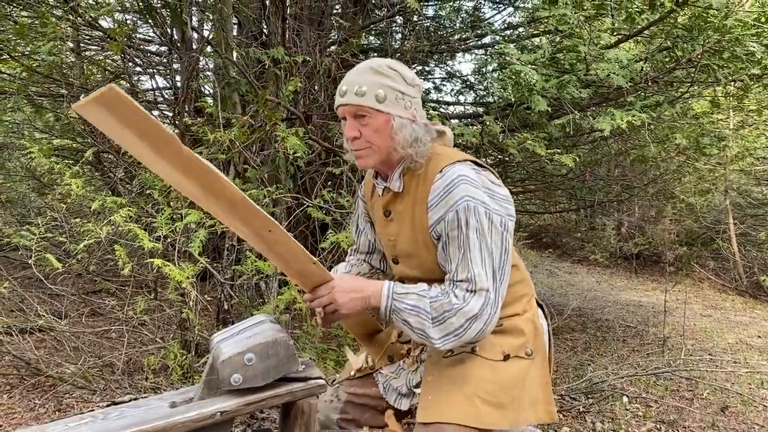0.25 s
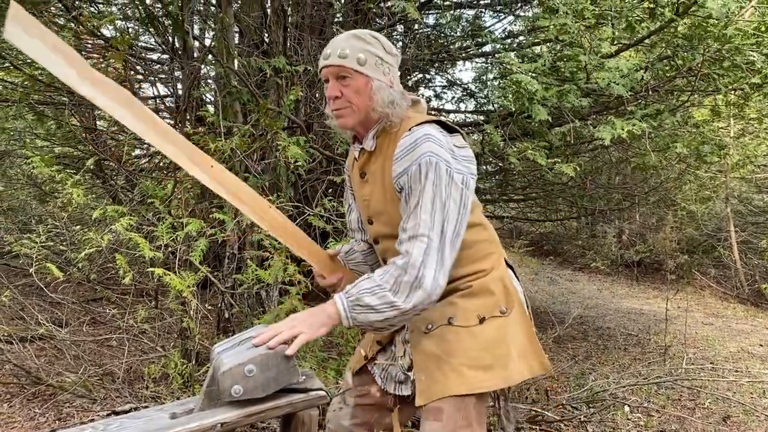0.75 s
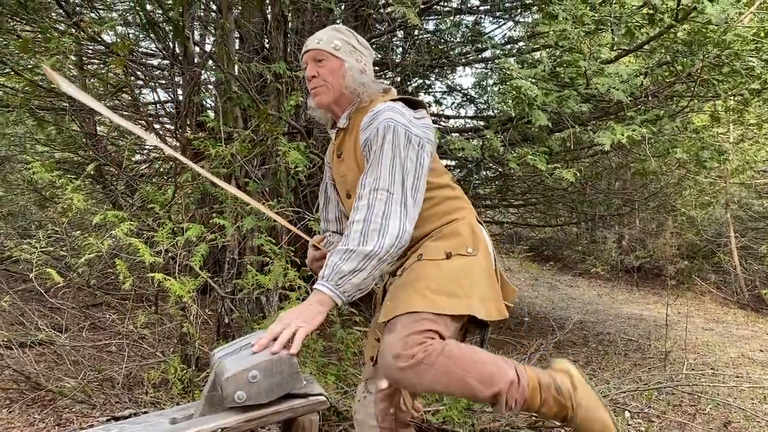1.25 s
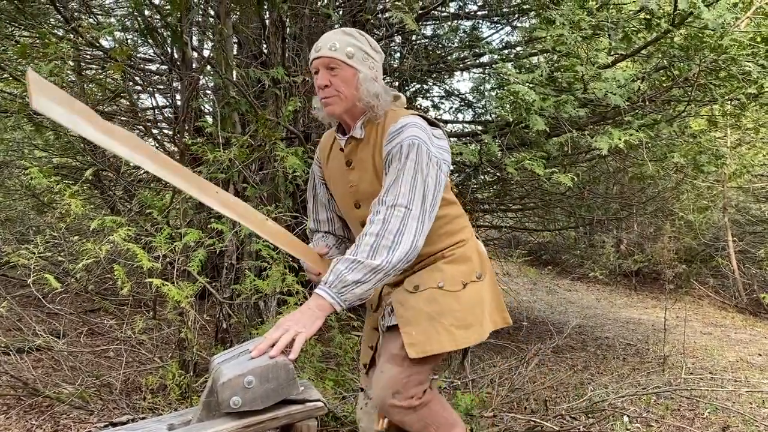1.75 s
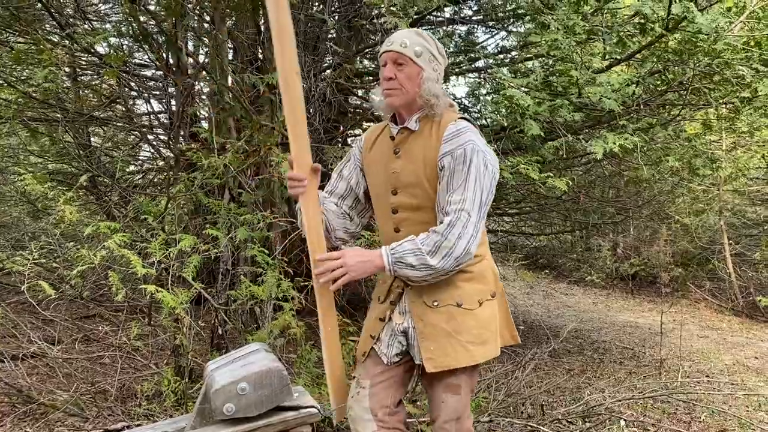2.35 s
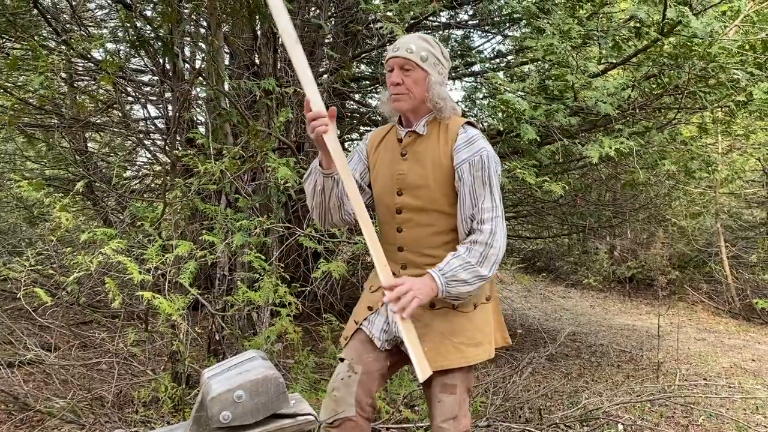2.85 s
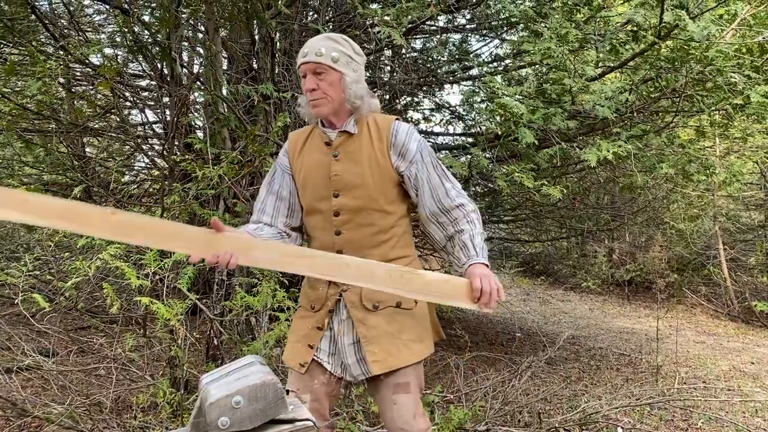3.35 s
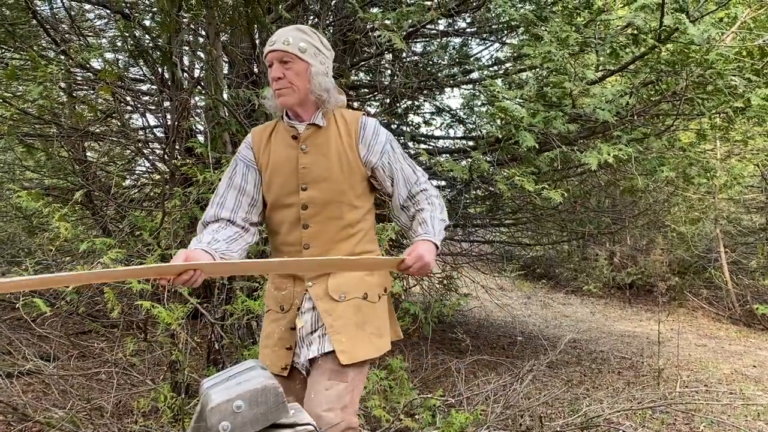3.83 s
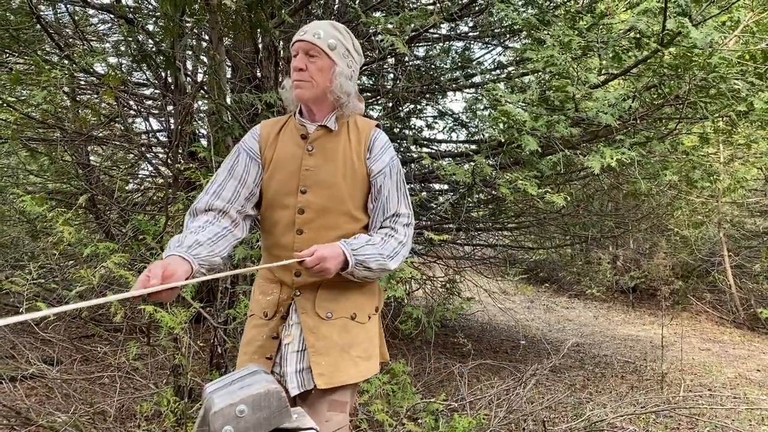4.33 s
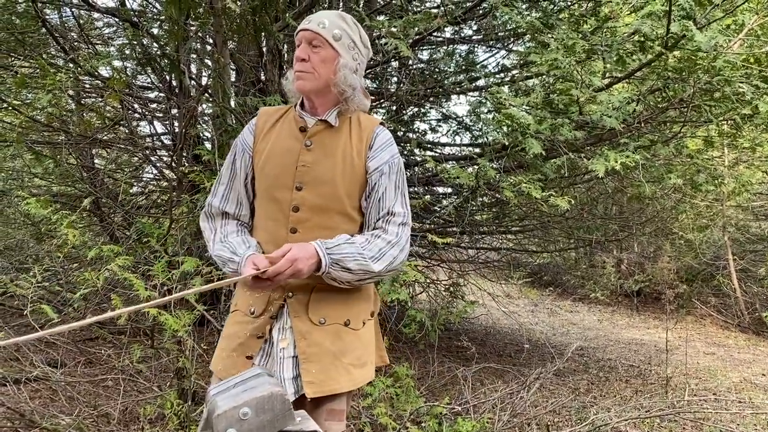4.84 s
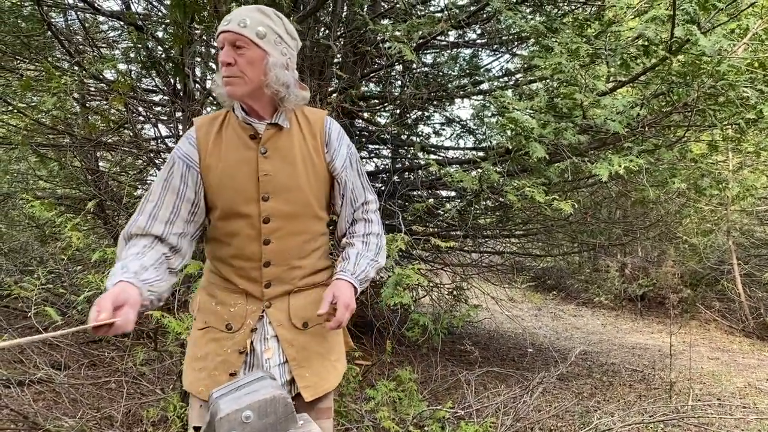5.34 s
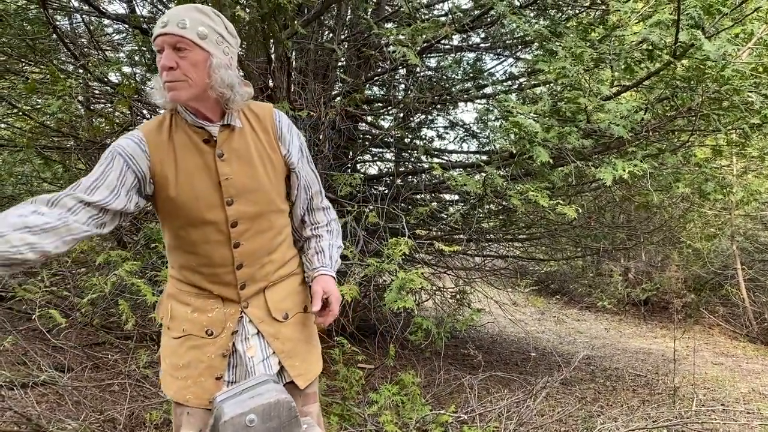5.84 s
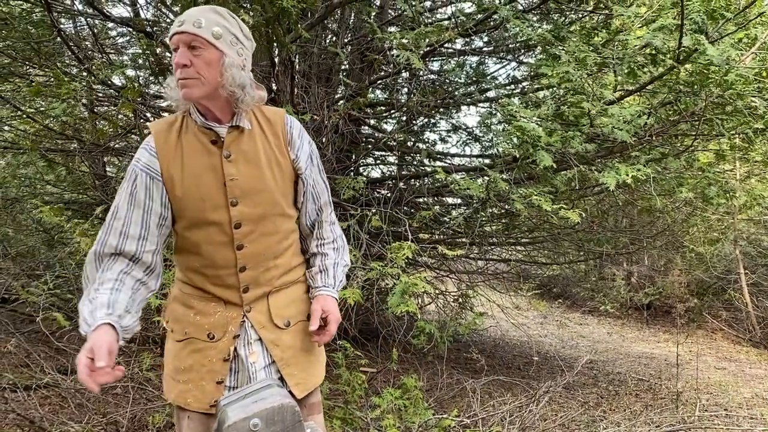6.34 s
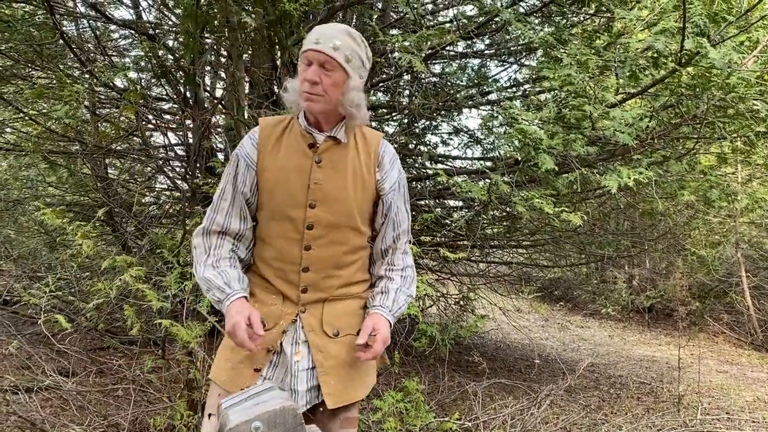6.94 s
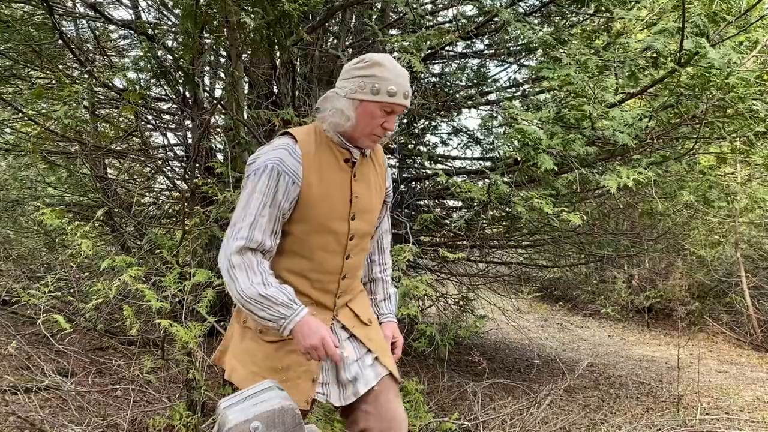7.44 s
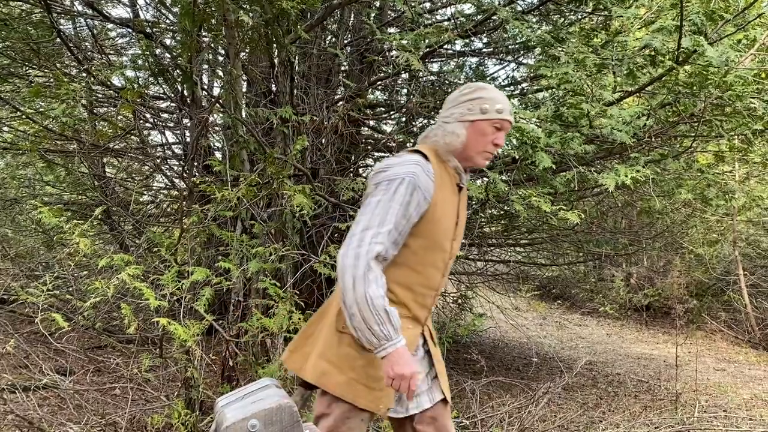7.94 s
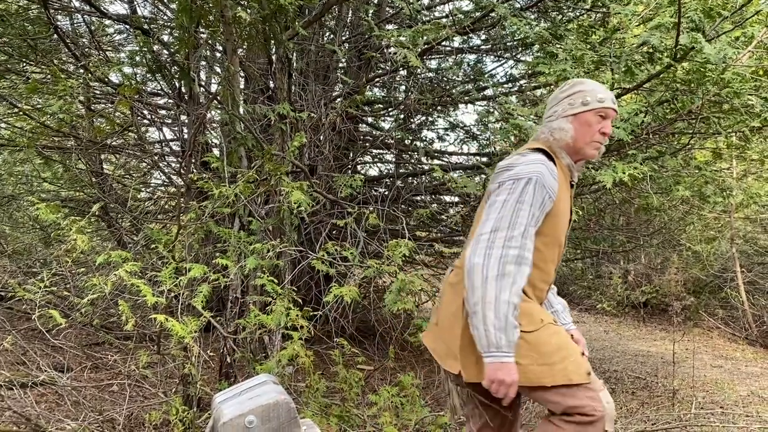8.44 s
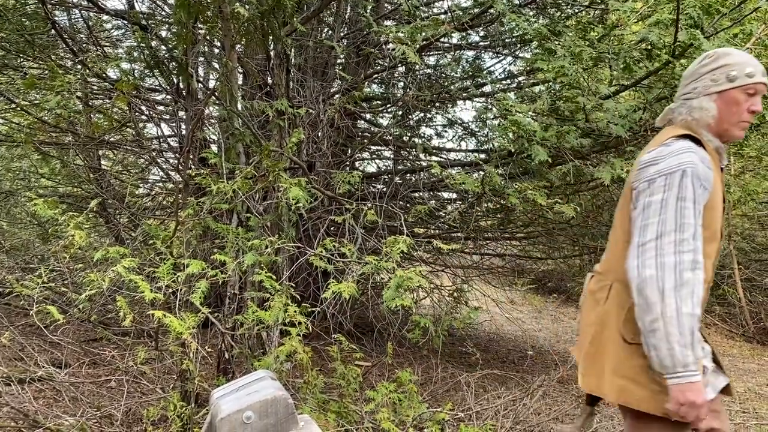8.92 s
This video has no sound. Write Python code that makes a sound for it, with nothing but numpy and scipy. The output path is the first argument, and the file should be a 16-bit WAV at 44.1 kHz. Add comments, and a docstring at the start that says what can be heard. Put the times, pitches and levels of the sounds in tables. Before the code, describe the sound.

Close outdoor sound in a quiet wood with faint distant engine hum. A man climbs off a wooden work bench, feet rustling and crunching in shavings and dry litter with small twig cracks. A palm smacks the end of a thin board; it rubs lightly, then drops onto a pile with a loud hollow clatter, bouncing and rattling to rest. Crackling steps then move off.

```python
"""A long thin board slides onto a pile, drops, bounces and rattles: noise bursts and rubs drive damped modes.
A man climbs off a shaving horse, treads on shavings and dry litter, and walks away: grains, cracks, thuds.
A palm smacks the board's end and dull bumps fall: damped sines. Behind lie a quiet wood, as filtered
noise, and far engines, as wavering tones. The recorder turns itself down after loud blows."""
import sys
import numpy as np
from scipy import signal
from scipy.fft import rfft, irfft
from scipy.io import wavfile
from scipy.ndimage import uniform_filter1d

SR = 44100
rng = np.random.default_rng(int(sys.argv[2]) if len(sys.argv) > 2 else 0)


def unload_audio(sound):
    """Save the sound as a 16-bit wav file, at the path given as the first command line argument."""
    columns = np.transpose(np.atleast_2d(sound))
    # keep every value between -1 and 1, then stretch to whole-number steps
    steps = np.round(np.clip(columns, -1, 1) * 32767)
    wavfile.write(sys.argv[1], SR, steps.astype(np.int16))


N = 404838


def from_db(db):
    """Decibels to amplitude gain."""
    return 10 ** (np.asarray(db) / 20)


def rms_one(x):
    """Scale to rms 1."""
    return x / np.sqrt(np.mean(x ** 2) + 1e-20)


def in_time(rows):
    """Interpolate the columns of a curve table to one value a sample."""
    s, *columns = np.transpose(rows)
    return [np.interp(np.arange(N) / SR, s, column) for column in columns]


def filtered(x, order, hz, kind):
    """Butterworth filter."""
    return signal.sosfilt(signal.butter(order, hz, kind, fs=SR, output="sos"), x)


def colour(x, spectrum):
    """Minimum-phase filter that follows the spectrum; white noise of rms 1 comes out with rms 1."""
    hz, db = np.transpose(spectrum)
    grid_hz = np.linspace(0, SR / 2, 4097)
    log_gain = np.log(from_db(np.interp(np.log(grid_hz + 1), np.log(hz), db)))
    cepstrum = irfft(log_gain)
    cepstrum[1:4096] *= 2
    cepstrum[4097:] = 0       # folding the cepstrum gives the minimum phase
    kernel = irfft(np.exp(rfft(cepstrum)))[:4096]
    return signal.fftconvolve(x, kernel / np.sqrt(np.sum(kernel ** 2)))[:N]


def drift(rate_hz):
    """Slow random wandering of rms 1: noise through a two-pole lowpass."""
    r = np.exp(-2 * np.pi * rate_hz / SR)
    noise = rng.standard_normal(N + SR)
    return rms_one(signal.lfilter([1], [1, -2 * r, r * r], noise)[SR:])


def ring(force, hz, t60_s):
    """Damped resonator: a unit click sets a sine of starting height 1 ringing."""
    r, w = from_db(-60 / (t60_s * SR)), 2 * np.pi * hz / SR
    return signal.lfilter([0, np.sin(w)], [1, -2 * r * np.cos(w), r * r], force + 1e-18)


def grains(per_s, spread_db, clump_db, hiss):
    """Random clicks of uneven size plus a share of friction hiss, swelling in clumps; rms 1."""
    sizes = from_db(spread_db * np.minimum(rng.exponential(1, N), 5)) * rng.choice([-1, 1], N)
    born = rng.random(N) < per_s / SR
    clumps = from_db(clump_db * drift(25.0))
    return rms_one(clumps * (rms_one(sizes * born) + hiss * rng.standard_normal(N)))


def bursts(rows, t60s, texture, contact=0.92):
    """Bursts of a texture at (s, dB), each led by the click of first contact and dying with its own t60."""
    envelope, clicks = np.zeros(N + SR), np.zeros(N)
    t = np.arange(SR // 4) / SR
    for (s, db), t60_s in zip(rows, t60s):
        envelope[round(s * SR):][:len(t)] += from_db(db - 60 * t / max(t60_s, .002))
        clicks[round(s * SR)] = contact * from_db(db)
    return envelope[:N] * texture + clicks


def thuds(rows):
    """Damped sines at (s, dB, Hz, cycles until 60 dB down)."""
    out, click = np.zeros(N + 8000), np.arange(8000) == 0
    for s, db, hz, cycles in rows:
        out[round(s * SR):][:8000] += ring(from_db(db) * click, hz, cycles / hz)
    return out[:N]


def ticks(clicks, cycles):
    """Each click is dealt to one of 12 small dry splinters, ringing a few cycles at its own pitch."""
    dealt = rng.integers(0, 12, N)
    pitches_hz = np.geomspace(2200, 9000, num=12)
    return sum(ring(clicks * (dealt == k), hz, cycles / hz) for k, hz in enumerate(pitches_hz))


# Air spectrum. Each row: pitch in Hz, relative level in dB.
AIR_SPECTRUM = [(15, -51), (25, -6), (180, 6.5), (242, -4.5), (962, -4), (1400, -11.5), (1890, -32),
                (4370, -24), (14800, -21.5), (16000, -22)]
AIR_DB = -63.5


def air():
    """Air of the wood: coloured noise of gently wandering level."""
    level = from_db(AIR_DB + 0.45 * drift(2.0))
    return level * colour(rng.standard_normal(N), AIR_SPECTRUM)


# Far hums. Each row: start in seconds, end in seconds, pitch in Hz, rms wavering in Hz, mean level in dB.
FAR_HUMS = [(.4, 1.83, 183, 3.84, -67), (2.603, 5.048, 64, 3.55, -70.5), (5.2, 8.404, 103, 2.5, -65)]


def hums():
    """Far engines: sines of wandering pitch that swell and fade."""
    t, out = np.arange(N) / SR, np.zeros(N)
    for start, end, hz, waver_hz, db in FAR_HUMS:
        fade = np.clip(np.minimum(t - start, end - t) / 0.25, 0, 1)
        swell = fade * from_db(db + 2.0 * drift(1.5))
        out += swell * np.sin(2 * np.pi * np.cumsum(hz + waver_hz * drift(3.85)) / SR)
    return out


# Steps and shifts of weight in the litter. Each row: loudest moment in seconds, dying time in seconds,
# crisp rustle level in dB, dull crunch level in dB.
FOOTFALLS = [(.09, 0.081, -57.5, -65), (.32, 0.13, -50, -54.5), (.55, .06, -62, -66),
             (.71, 0.13, -64.5, -59), (.92, 0.094, -55.5, -58), (1.12, 0.093, -60.5, -57.5),
             (1.4, 0.18, -61.5, -73), (1.84, 0.52, -48.5, -49.5), (2.1, 0.34, -49.5, -48.5),
             (2.5, 0.11, -54.5, -54.5), (3.0, 0.12, -49.5, -50.5), (3.25, .12, -47, -52),
             (3.39, .2, -53, -55), (3.73, 0.19, -52, -50.5), (3.85, 0.22, -51, -49.5),
             (4.07, 0.095, -58, -52.5), (4.33, 0.23, -59.5, -50), (4.5, 0.34, -54.5, -58.5),
             (4.74, 0.11, -54, -54), (5.12, .1, -58.5, -54.5), (5.36, 0.19, -54, -50),
             (5.71, 0.047, -48, -45.5), (6.55, 0.31, -63, -61), (6.88, 0.14, -59.5, -57),
             (7.16, 0.13, -56, -51.5), (7.319, 0.23, -48, -49), (7.62, 0.074, -55, -54.5),
             (7.909, 0.084, -42.5, -42.5), (8.43, 0.055, -63, -66), (8.669, .28, -56.5, -54)]
# Cloth and shavings stirring between the steps. Each row: time in seconds, rustle level in dB.
STIR_CURVE = [(0, -67.5), (.22, -62), (.65, -69.5), (1.75, -67.5), (2.55, -61), (2.7, -52), (2.92, -51.5),
              (3.12, -63), (4.2, -70), (4.9, -63.5), (5.25, -65), (5.63, -59), (5.8, -67), (7.05, -72),
              (7.5, -61), (7.7, -59), (7.8, -48), (8.02, -57), (8.3, -68), (9.18, -69.5)]
PRESS_S, PRESS_DB, FADE_DB = 0.079, 12, 12      # rustle: rise per press time, fall per dying time
CRUNCH_SWING = 1.51      # crunch dB per rustle dB within a step
STIR_CRUNCH_DB, STIR_CRUNCH_SWING = -65, 1.06      # crunch at a stir of -60.5 dB; crunch dB per stir dB


def tread_levels():
    """Gains of rustle and crunch: each step presses and fades; steps and stir add in power."""
    t, (stir_db,) = np.arange(N) / SR, in_time(STIR_CURVE)
    crisp_power = from_db(stir_db) ** 2
    crunch_power = from_db(STIR_CRUNCH_DB + STIR_CRUNCH_SWING * (stir_db + 60.5)) ** 2
    for s, dying_s, crisp_db, crunch_db in FOOTFALLS:
        near = slice(max(round(s * SR) - SR // 2, 0), round(s * SR) + SR)
        press_db = PRESS_DB * (s - t[near]) / PRESS_S
        fade_db = FADE_DB * (t[near] - s) / dying_s
        below_db = np.maximum(press_db, fade_db)
        crisp_power[near] += from_db(crisp_db - below_db) ** 2
        crunch_power[near] += from_db(crunch_db - CRUNCH_SWING * below_db) ** 2
    return np.sqrt(crisp_power), np.sqrt(crunch_power)


# Spectra of the dull crunch and the crisp rustle. Each row: pitch in Hz, relative level in dB per Hz.
CRUNCH_SPECTRUM = [(53, -26), (90, -25.5), (209, -4), (264, 3), (422, 0.5), (561, 1), (2000, -15),
                   (2600, -123), (4400, -120)]
CRISP_SPECTRUM = [(880, -46.5), (1500, -1.5), (1920, -11), (2300, -3.5), (2830, -7), (3660, 0.5),
                  (4460, -1), (8570, -8), (16000, -31)]


def tread():
    """Litter gives under the foot with a dull crunch while its dry edges hiss and crackle."""
    crisp_gain, crunch_gain = tread_levels()
    crush = grains(2000, spread_db=2.8, clump_db=2.5, hiss=0.9)
    lumps = grains(250, spread_db=4.0, clump_db=4.5, hiss=0.62)      # larger pieces giving way
    crackle = rms_one(ticks(grains(260, spread_db=3.8, clump_db=3.0, hiss=0), cycles=11.5))
    sparse = grains(45, spread_db=3.0, clump_db=0, hiss=0)
    rustle = colour(crush + .33 * sparse, CRISP_SPECTRUM) * from_db(1.9 * drift(3.2))
    crisp = rustle + 0.43 * crackle
    crunch = colour(0.88 * crush + 1.064 * lumps, CRUNCH_SPECTRUM)
    return crunch_gain * crunch + crisp_gain * crisp


# Short sharp cracks: twigs, shavings, and the board's edge striking the pile.
# Each row: time in seconds, relative crack level in dB, relative thud level in dB.
SHARP_CRACKS = [(.2369, -34, -42), (0.3353, -26, -53), (.9254, -29.5, -29.5), (1.3648, -32, -42),
                (2.087, -31, -28), (2.1296, -25, -27), (2.4869, -28.5, -30), (2.9394, -25, -26),
                (2.955, -31.5, -26.5), (2.9971, -27, -32), (3.026, -28.5, -25), (3.1557, -28.5, -42),
                (3.1923, -19.5, -26.5), (3.233, -21, -28), (3.253, -25, -37), (3.2707, -27.5, -36),
                (3.712, -31.5, -35), (3.9738, -30.5, -22), (4.1433, -29.5, -41), (5.051, -36, -45),
                (5.342, -25, -35), (5.965, -6, -23), (6.5613, -32.5, -57), (6.6184, -35.5, -36.5),
                (6.6775, -44, -34), (6.803, -36, -47), (6.855, -30, -36), (7.066, -41.5, -50),
                (7.3303, -28, -33), (7.616, -51, -32), (7.9174, -22, -30), (7.9684, -23.5, -33),
                (8.4255, -44, -30), (9.16, -31.5, -40)]


def cracks():
    """A short bright noise burst with a high damped ring, over a brief thud."""
    rows = np.array(SHARP_CRACKS)
    crack = bursts(rows[:, :2], np.full(len(rows), .014), rng.standard_normal(N))
    crack = colour(crack, CRISP_SPECTRUM) * from_db(-8.5)
    chance = rng.standard_normal((len(rows), 2))
    ring_hz = 3600 * 2 ** (.5 * chance[:, 0])
    thud_hz = 520 * 2 ** (0.51 * chance[:, 1])
    high_ring = thuds([(s, db - 7.0, hz, 22.0) for (s, db, _), hz in zip(SHARP_CRACKS, ring_hz)])
    thud = thuds([(s, db, hz, 4.0) for (s, _, db), hz in zip(SHARP_CRACKS, thud_hz)])
    return crack + high_ring + filtered(thud, 2, 220, "high")


# Heels on soft ground, shins against wood. Each row: time in seconds, level in dB, pitch in Hz,
# cycles until 60 dB down.
BODY_BUMPS = [(1.089, -42, 446, 49), (1.1, -41, 115, 4.9), (2.13, -36, 126, 5.5), (5.3, -43, 143, 10),
              (6.932, -37.5, 445, 24)]


def bumps():
    """Soft blows of heels and shins: damped sines."""
    return thuds(BODY_BUMPS)


# Rings of the smacked board end, lowest first. Each row: level in dB, pitch in Hz, cycles until 60 dB down.
SMACK_MODES = [(-14.5, 537, 8.8), (-23, 1000, 10), (-17, 1700, 12.7), (-28.5, 2340, 10), (-16, 3540, 17)]
SMACK_S, SMACK_LAG_S = 4.6122, .0005      # first ring; lag of each next higher ring


def smack():
    """A palm smacks the end of the board: damped sines, each higher one slightly later."""
    return thuds([(SMACK_S + k * SMACK_LAG_S, *mode) for k, mode in enumerate(SMACK_MODES)])


# Slap spectrum. Each row: pitch in Hz, relative level in dB per Hz.
SLAP_SPECTRUM = [(710, -7), (1200, 0), (2110, 11.5), (3620, 11.5), (6510, -1), (9010, -15), (16000, -70)]
SLAP_T60_S, SOFT_SLAP_DB, SOFT_SLAP_HZ = 0.1, -30, 4180      # slaps weaker than this are lowpassed here


def board_slap(rows):
    """Surfaces clap together: bursts of contact grains, the weak ones muffled."""
    contacts = grains(900, spread_db=3.5, clump_db=0.5, hiss=0.98)
    is_hard = rows[:, 2] >= SOFT_SLAP_DB
    hard, soft = (bursts(some[:, [0, 2]], np.full(len(some), SLAP_T60_S), contacts)
                  for some in (rows[is_hard], rows[~is_hard]))
    return colour(hard + filtered(soft, 2, SOFT_SLAP_HZ, "low"), SLAP_SPECTRUM)


# The board knocking on the pile. Each row: time in seconds, relative blow level in dB,
# relative slap level in dB, dullness in dB per octave.
BOARD_KNOCKS = [(4.277, -27, -52.5, 4), (4.338, -35.5, -58, 11), (5.021, -41.5, -52, 3.5),
                (5.341, -29.5, -34, 4), (5.869, -8.5, -21.5, -1.5), (5.878, -14, -30, 1.5),
                (5.915, -5, -24, 4.5), (5.933, -6.5, -28.5, -2), (5.963, -16, -25, 1.5),
                (6.018, -21, -37, 4.5), (6.036, -13, -30.5, 2.5), (6.045, -21, -34.5, 3),
                (6.057, -18, -36, 9), (6.076, -11.5, -28.5, 1.5), (6.129, -20.5, -37, 1.5),
                (6.139, -24.5, -37.5, 4), (6.155, -18.5, -46, 6.5), (6.212, -25.5, -52, 4),
                (6.223, -24.5, -43.5, 4.5), (6.271, -26.5, -51, 2), (6.297, -26.5, -49.5, 4.5),
                (6.362, -32, -57, 8.5), (6.428, -42, -59, 11)]
# The board rubbing over the pile and shuddering to rest. Each row: middle in seconds, length in seconds,
# relative level in dB, centre pitch in Hz.
BOARD_RUBS = [(4.794, 0.14, -60.5, 860), (4.872, 0.072, -43.5, 806), (4.928, 0.032, -46, 820),
              (5.058, 0.028, -39, 996), (5.124, 0.13, -52.5, 1110), (5.302, 0.13, -51, 980),
              (5.634, 0.17, -55.5, 860), (5.721, 0.094, -43.5, 740), (5.26, 1, -50, 325),
              (6.45, 0.22, -39.5, 157)]
# Board modes. Each row: pitch in Hz, relative level in dB.
BOARD_MODES = [(98, -25.5), (135, -26), (163, -17.5), (205, -14.5), (281, -8), (320, -9), (377, -5),
               (436, -3.5), (495, -7), (565, -3.5), (635, -1.5), (700, 1.5), (793, -4), (857, 4.5),
               (930, 2.5), (1010, 2.5), (1130, -1), (1305, -4), (1513, -5.5)]
REFERENCE_BLOW_DB = -15
RATTLE_T60_S, RATTLE_S_PER_DB = 0.088, 0.0051      # at a blow of -15 dB; added per dB weaker, taken off per dB stronger
BENDING_HZ, BENDING_LOSS = 150, .5      # modes below this pitch lose extra dB per dB a blow is under -15 dB


def board():
    """Each knock is a brief rattle of contacts, each rub a rough scrape; both shake the same modes."""
    rows, t = np.array(BOARD_KNOCKS), np.arange(N) / SR
    s, blow_db, dullness = rows[:, 0], rows[:, 1], rows[:, 3]
    strokes = [np.clip(1 - (2 * (t - middle) / length) ** 2, 0, 1) for middle, length, _, _ in BOARD_RUBS]
    rattle_s = RATTLE_T60_S + RATTLE_S_PER_DB * (REFERENCE_BLOW_DB - blow_db)
    out = np.zeros(N)
    for k, (hz, level_db) in enumerate(BOARD_MODES):
        spot_db = rng.normal(0, 2.6, len(rows))      # every blow lands on another spot
        db = blow_db - dullness * np.log2(max(hz, 220) / 500) + spot_db
        if hz < BENDING_HZ:
            db -= BENDING_LOSS * np.maximum(REFERENCE_BLOW_DB - blow_db, 0)
        contact = 5.5 * (-1) ** k      # neighbouring modes start in opposite sense
        knock = bursts(np.c_[s, db], rattle_s, rng.standard_normal(N), contact) * from_db(-33.5)
        stirred = sum(stroke * from_db(rub_db - 53 * abs(np.log2(hz / rub_hz)))      # mostly nearby modes
                      for stroke, (_, _, rub_db, rub_hz) in zip(strokes, BOARD_RUBS))
        rub = from_db(-22) * stirred * rng.standard_normal(N)
        t60_s = 0.053 * (800 / hz) ** 1.13      # wood damps its upper modes faster
        out += from_db(level_db) * ring(knock + rub, hz, t60_s)
    return out + board_slap(rows)


def scatter(near):
    """Short dull scatter off ground and trunks: lowpassed noise decaying 60 dB in 67 ms."""
    t = np.arange(SR // 8) / SR
    dull = signal.lfilter([.3], [1, -.7], rng.standard_normal(len(t)))
    echoes = dull * from_db(-60 * t / 0.067) * (t > .003)
    return from_db(-32.5) * signal.fftconvolve(near, echoes)[:N]


def scene():
    """Everything near with its scatter, over the air and the hums."""
    near = tread() + cracks() + bumps() + smack() + board()
    near = filtered(near, 3, 95, "high")      # keeps the near sounds free of deep bass
    return (near + scatter(near) + air() + hums())[None]


def record(dry):
    """Gain control ducks after loud blows and recovers slowly; a steep lowpass cuts the top."""
    t = np.arange(N) / SR
    level_db = 10 * np.log10(uniform_filter1d(dry[0] ** 2, size=441) + 1e-12)
    held_db = np.maximum.accumulate(level_db + 30 * t) - 30 * t      # peaks held, falling 30 dB/s
    cut_db = 0.22 * np.maximum(held_db + 38, 0)
    cut_db = signal.lfilter([.004], [1, -.996], cut_db)
    lowpass = signal.cheby2(14, 40, 16150, fs=SR, output="sos")      # 40 dB down from 16150 Hz
    return signal.sosfilt(lowpass, dry * from_db(-cut_db))


dry = scene()
out = record(dry)
unload_audio(out)
```